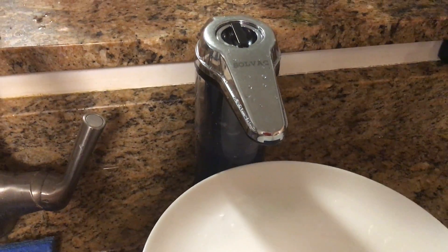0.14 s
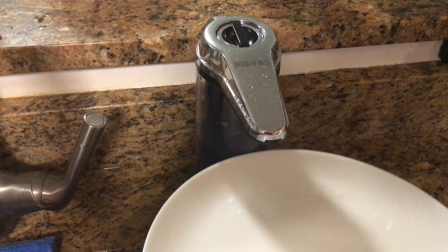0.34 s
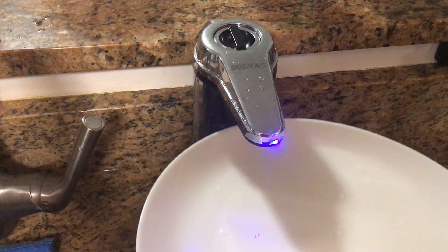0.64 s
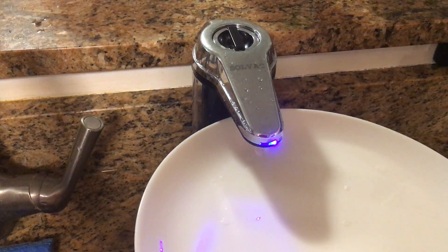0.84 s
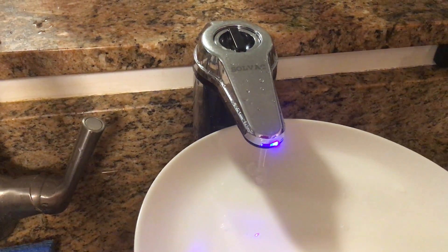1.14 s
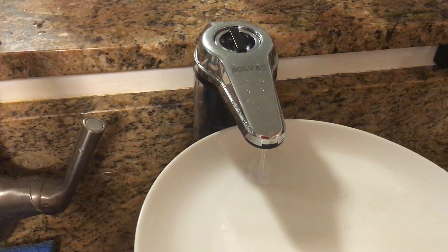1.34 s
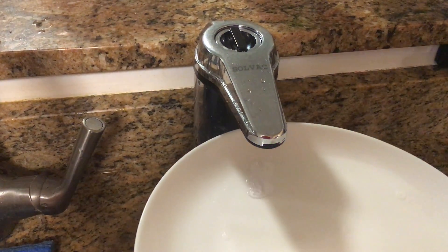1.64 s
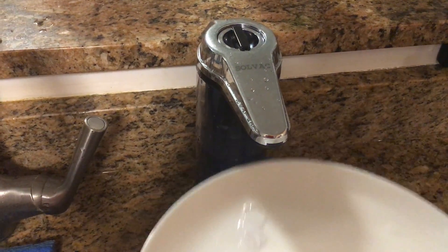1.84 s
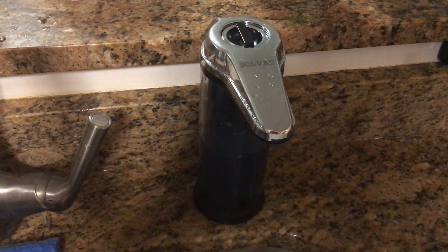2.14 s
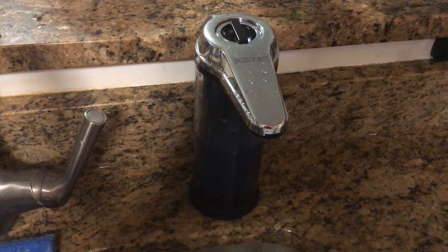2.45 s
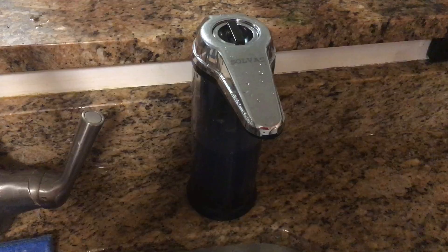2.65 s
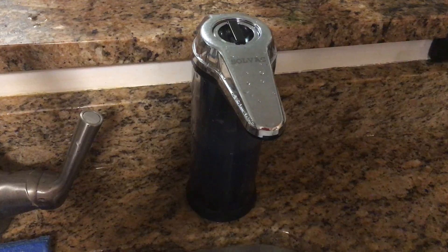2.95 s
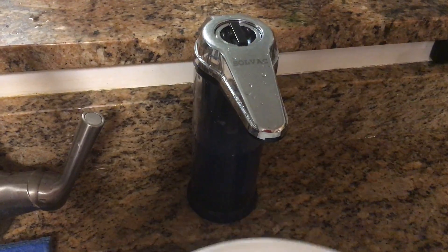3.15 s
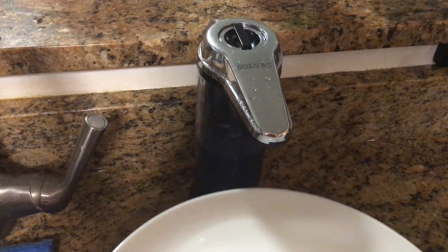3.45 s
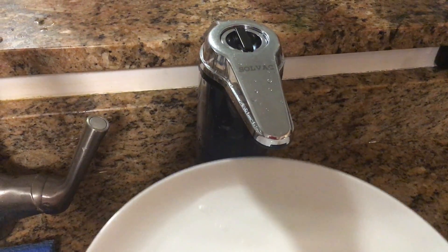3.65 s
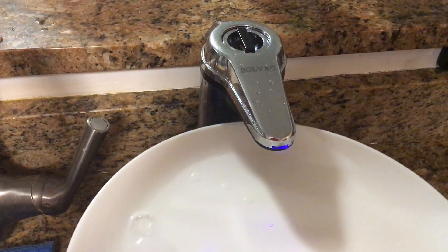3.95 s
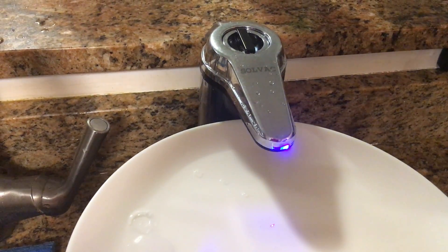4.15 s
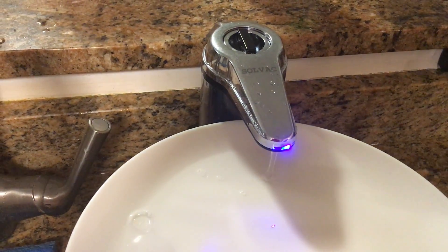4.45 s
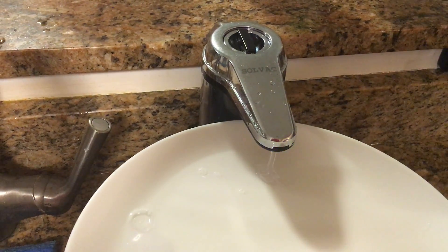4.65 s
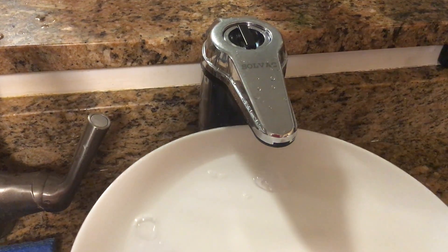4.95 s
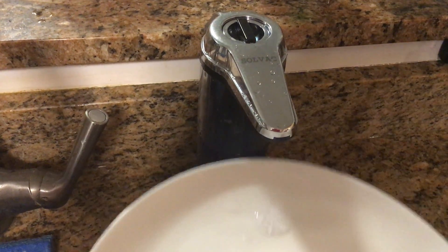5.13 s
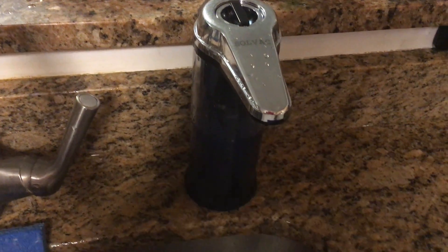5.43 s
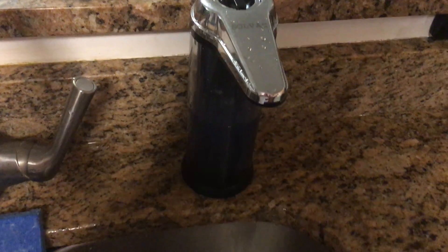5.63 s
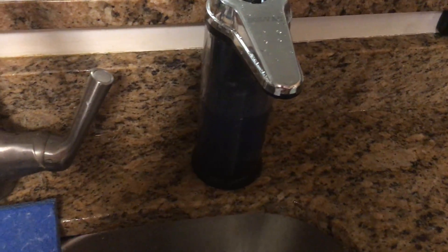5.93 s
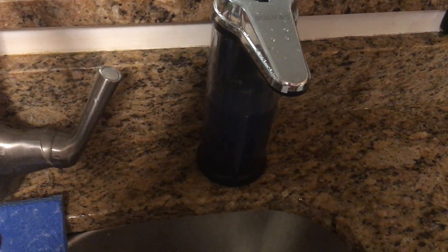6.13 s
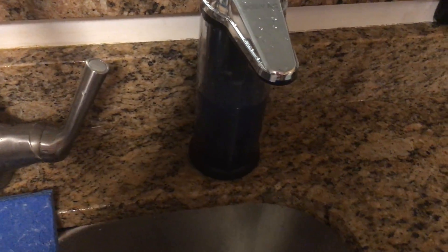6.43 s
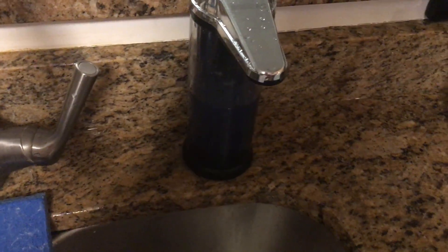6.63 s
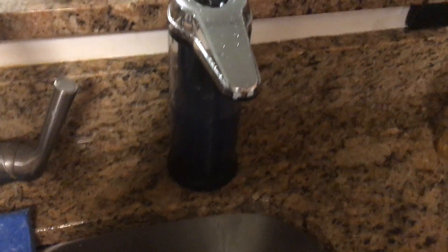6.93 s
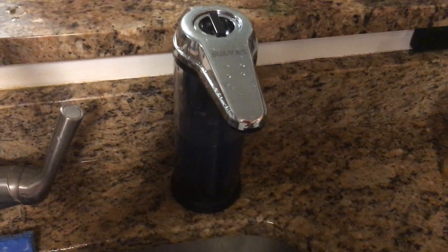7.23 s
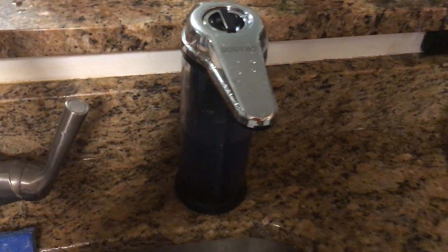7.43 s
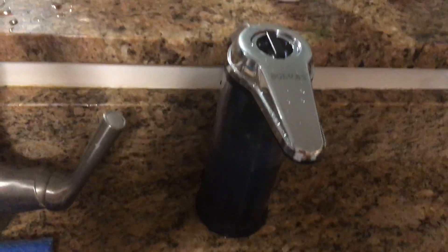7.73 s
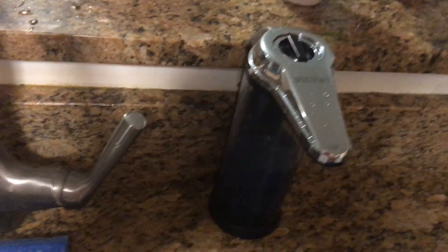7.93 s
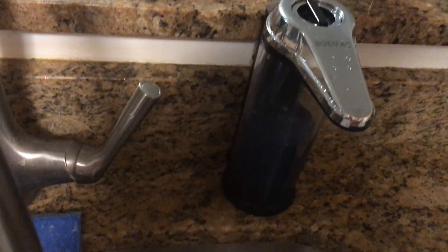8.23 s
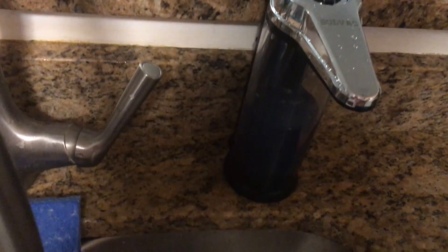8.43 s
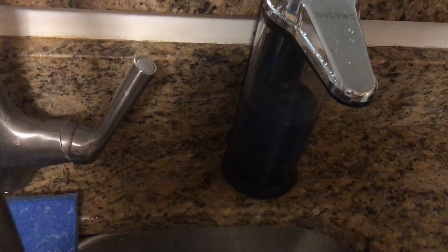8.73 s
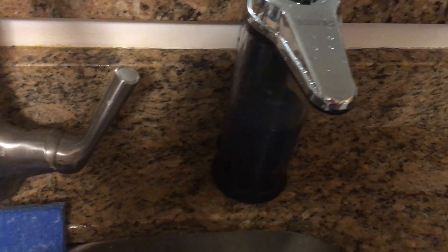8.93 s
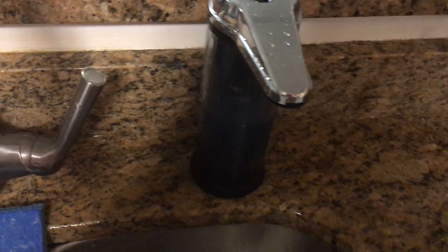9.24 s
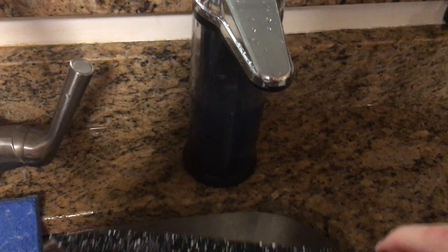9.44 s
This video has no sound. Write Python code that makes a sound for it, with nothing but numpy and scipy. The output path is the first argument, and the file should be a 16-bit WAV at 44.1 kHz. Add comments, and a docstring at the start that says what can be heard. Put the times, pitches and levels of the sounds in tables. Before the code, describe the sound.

Close recording over a low room hum: soft ceramic clinks, a small gritty electric pump buzzing twice in two pairs, long then short, with bubbly soap sounds. Faint rubbing on china between. Around six seconds the plate knocks, then strikes and grates across a steel sink, much louder than the pump, with hollow metal ringing and a short room tail, then quiet and light ticks.

```python
"""Over a small kitchen's low hum, light knocks ring the modes of a china plate.
A touchless soap dispenser serves twice: its geared pump runs forward, coasts, then briefly sucks back.
Soap sings through the nozzle, bubbles tick, and between the servings a finger rubs the plate by stick-slip.
The plate is then set down in a steel sink: it knocks, rebounds and slides, and the steel rings on.
At the end come a few light ticks. The room adds a diffuse tail to every source but its own hum."""
import sys
import numpy as np
from scipy import signal
from scipy.fft import rfft, irfft, next_fast_len
from scipy.io import wavfile
from scipy.ndimage import uniform_filter1d

SR = 44100
rng = np.random.default_rng(int(sys.argv[2]) if len(sys.argv) > 2 else 0)


def to_wav(sig):
    """Store sig (one row per channel, or 1-D mono) as 16-bit WAV at the path in sys.argv[1].

    Samples outside -1..1 are clipped; the rate is SR.
    """
    pcm = np.clip(np.atleast_2d(sig), -1, 1) * 32767
    pcm = np.round(pcm).astype(np.int16)
    wavfile.write(sys.argv[1], SR, pcm.T)  # frames by channels


N = 422460
TIME = np.arange(N) / SR

# free modes of the china plate: (frequency [Hz], relative level [dB], t60 [s])
PLATE_MODES = [(560, -22, .1), (574, -9.5, 0.22), (634, -13.5, .1), (769.4, -4.5, 0.19), (926, -9, .2),
               (1096.2, -8.5, 0.18), (1205, -11.5, 0.28), (1353.8, -4.5, 0.26), (1378.5, -3.5, .26),
               (1636.1, -7, 0.33), (2047, -9.5, 0.17), (2062, -4.5, 0.29), (2110.6, -5.5, 0.28),
               (2279.8, -10.5, 0.27), (2609, -9, 0.13), (3046, -7.5, 0.25), (3529, -11.5, 0.25),
               (3584, -9.5, 0.12), (4252, -15, 0.25), (4518, -12.5, 0.16), (4720, -16.5, 0.18),
               (5170, -22.5, 0.16), (5584, -15, 0.18), (5930, -15.5, 0.15), (5970, -18, 0.18),
               (7051, -21.5, .22), (7340, -22.5, .22), (8400, -37.5, .22), (8640, -29, 0.19),
               (8910, -31.5, .2), (9023, -22, 0.19), (10570, -29.5, 0.18), (11011, -30.5, 0.16),
               (12263, -35, .18), (12896, -35.5, 0.16), (13922, -36, .16)]
# spectrum of the steel sink when shaken: (frequency [Hz], relative level [dB])
SINK_SPECTRUM = [(40, -32), (80, -16), (115, -3), (165, 6.5), (235, -1), (310, 4.5), (420, -7.5),
                 (650, -4.5), (1200, -4.5), (2200, -18), (4000, -45), (16000, -58.5)]


def amp(db):
    """Decibels to amplitude gain."""
    return 10 ** (np.asarray(db) / 20)


def unit(x):
    """Normalization to an rms of one."""
    return x / np.sqrt(np.mean(x ** 2) + 1e-20)


def read(points, hz):
    """Linear interpolation of a table on a log-frequency axis."""
    f, value = np.transpose(points)
    return np.interp(np.log(hz + 1), np.log(f), value)


def follow(rows):
    """Linear interpolation in time: the start of a table and its columns as sample-rate curves."""
    s, *columns = np.transpose(rows)
    t = np.arange(s[0], s[-1], 1 / SR)
    return s[0], [np.interp(t, s, c) for c in columns]


def colour(x, points, tilt_db=0):
    """Spectral shaping: x filtered by a spectrum with a tilt in dB per octave, at unit rms."""
    size = next_fast_len(len(x))
    hz = np.fft.rfftfreq(size, 1 / SR)
    gain = amp(read(points, hz) + tilt_db * np.log2(1 + hz / 1000))
    return unit(irfft(rfft(x, size) * gain, size)[:len(x)])


def resonate(x, hz, width):
    """Resonance: a two-pole filter in a rotating frame, so its centre may glide, at unit rms."""
    turn = np.exp(2j * np.pi * np.cumsum(hz * np.ones(len(x))) / SR)
    r = np.exp(-np.pi * width / SR)
    ringing = signal.lfilter([1], [1, -2 * r, r * r], x / turn)
    return unit((turn * ringing).real)


def add(mix, s, sound):
    """Superposition: a sound enters the mix at s seconds."""
    part = mix[round(s * SR):][:len(sound)]
    part += sound[:len(part)]


def background(whirr_hz=1520, whirr_db=-76, floor_db=-53.5):
    """Broadband noise: a low room hum with the narrow, faint whirr of an appliance."""
    # spectrum of the room hum: (frequency [Hz], relative level [dB])
    floor_spectrum = [(15, -49.5), (25, -29), (44, -6.5), (64, 1.5), (86, -9), (122, 1), (198, -13),
                      (313, -11.5), (421, -16), (482, -30), (537, -20.5), (1020, -30), (1530, -28.5),
                      (1800, -34), (15500, -52)]
    hum, whirr = rng.standard_normal((2, N))
    return amp(floor_db) * colour(hum, floor_spectrum) + amp(whirr_db) * resonate(whirr, whirr_hz, 440)


def pressed_plate(width_hz=100):
    """Contact damping: the modes of the touched plate broaden and join a dense clatter spectrum."""
    # spectrum of the dense clatter: (frequency [Hz], relative level [dB])
    clatter_spectrum = [(150, -25), (600, -16.5), (1300, -5), (2100, -3), (2800, -15), (4400, -17.5),
                        (5100, -29.5), (5800, -21), (6600, -31), (7300, -26.5), (7900, -36), (9000, -29.5),
                        (9800, -38), (15500, -42)]
    hz = np.geomspace(100, 16000, num=500)
    centre, db, _ = np.transpose(PLATE_MODES)[:, :, None]
    modes = (amp(db) ** 2 / (1 + ((hz - centre) / width_hz) ** 2) ** 2).sum(0)
    power = modes + amp(read(clatter_spectrum, hz)) ** 2
    return np.transpose([hz, 10 * np.log10(power)])


def ring(tilt_db, length, focus_hz, lift_db, split=0.0037):
    """Modal synthesis: a blow excites close pairs of modes, weighted by the point of contact."""
    t = TIME[:SR // 2]
    hz, db, t60 = np.transpose(PLATE_MODES)[:, :, None]
    octaves = np.log2(hz / focus_hz)
    gain = amp(db + tilt_db * octaves + lift_db * np.exp(-(octaves / 0.19) ** 2))
    phase = rng.random(hz.shape)  # in cycles
    side = rng.uniform(-0.92, 1, hz.shape)
    first = np.sin(2 * np.pi * (hz * t + phase))
    second = .5 * np.cos(2 * np.pi * (hz * (1 + 2 * split * side) * t + phase))
    decay = amp(-60 * t / (t60 * length))
    return np.sqrt(2) * (gain * decay * (first + second)).sum(0) / np.linalg.norm(gain)


def knock(s, ring_db, clatter_db, thud_db, tilt_db, length, focus_hz, lift_db,
          clatter_t60=0.1226, thud_t60=0.2016, contact_hz=7000):
    """Impact: the blow rings the plate, with a dense short clatter and a duller thud from what it meets."""
    t = TIME[:SR // 2]
    clatter_noise, thud_noise = rng.standard_normal((2, len(t)))
    hz, db = pressed_plate().T
    # a soft contact loses the highest treble first
    contact = np.transpose([hz, db + min(tilt_db, 0) * (hz / contact_hz) ** 2])
    clatter = amp(clatter_db - 60 * t / clatter_t60) * colour(clatter_noise, contact, tilt_db)
    thud = amp(thud_db - 60 * t / thud_t60) * colour(thud_noise, SINK_SPECTRUM, tilt_db=-5.5)
    thud *= 1 - np.exp(-t / 0.0015)
    attack = 1 - np.exp(-t / .0003)
    return s, (amp(ring_db) * ring(tilt_db, length, focus_hz, lift_db) + clatter + thud) * attack


def chatter(s, ring_db, clatter_db, thud_db, tilt_db, length, focus_hz, lift_db, rebound_db,
            count=3, uneven=.15):
    """Lossy rebound: the plate lands again twice, unevenly timed, each time weaker and duller."""
    rebound_s, dulling_db_per_octave, rebound_thud_db = .0085, -1.3, -7.5
    out = np.zeros(SR)
    for k in range(count):
        jitter = np.clip(uneven * rng.standard_normal(), -.5, .5)
        delay = rebound_s * (k + min(k, 1) * jitter)  # the first blow is on time
        loss_db = k * rebound_db
        add(out, *knock(delay, ring_db + loss_db, clatter_db + loss_db,
                        thud_db + loss_db + k * rebound_thud_db,
                        tilt_db + k * dulling_db_per_octave, length, focus_hz, lift_db))
    return s, out


def kitchen(x):
    """Diffuse reverberation: convolution with noise whose decay time depends on frequency."""
    # reverberation time of the kitchen: (frequency [Hz], t60 [s])
    decay_times = [(100, .55), (500, 0.43), (2000, 0.58), (5000, 0.46), (14000, 0.57)]
    hz, t, z = signal.stft(rng.standard_normal(SR), SR, nperseg=256)
    decay = amp(-60 * t / read(decay_times, hz)[:, None])
    tail = signal.istft(z * decay, SR, nperseg=256)[1]
    tail *= 1 - np.exp(-TIME[:len(tail)] / 0.0038)
    return signal.fftconvolve(x, unit(tail))[:N] / np.sqrt(len(tail))


def pump(on, off, full_speed, level_db, fizz_db, spin_up=.05, coast=0.17,
         rasp_db=-10, squeak_db=-19, growl_db=3, stop_db=-4):
    """Periodic excitation: uneven teeth strike the housing each turn; gears whine, the seal squeaks."""
    # gear tones: (multiple of the pump turn [1], relative level [dB])
    gears = [(12, -16.5), (20, -14), (21.66, -11.5), (31, -19.5), (33, -21), (39, -13), (40, -14.5),
             (44, -16.5), (45, -15), (53, -15.5), (59, -14.5), (68, -19), (76, -37.5)]
    # broad spectrum of the housing: (frequency [Hz], relative level [dB])
    housing = [(300, -12.5), (550, -8.5), (900, -13.5), (1150, -9), (1450, -4.5), (1900, -1), (2800, -5.5),
               (3600, -7), (4250, -12.5), (4660, -12), (5100, -14.5), (7200, -17), (8500, -25),
               (15500, -32.5)]
    # narrow resonances of the housing: (frequency [Hz], width [Hz], relative level [dB])
    shell = [(1498.3, 76.5, -10.5), (1875, 136, -17.5), (2105, 140, -18), (2403.5, 73, -15),
             (3110, 68, -22), (3376, 210, -19.5), (3655, 50, -19), (4697, 240, -26)]
    # spectrum of the starting growl: (frequency [Hz], relative level [dB])
    growl_spectrum = [(400, -22.5), (750, -9), (1100, -2.5), (1450, 5.5), (1750, -1), (2300, -6),
                      (2700, -30.5), (8000, -35.5)]
    t = TIME[:round((off - on + coast) * SR)]
    since_off = np.maximum(t - (off - on), 0)
    # share of full speed
    pace = (1 - .75 * np.exp(-t / spin_up)) * np.maximum(1 - since_off / coast, 0)
    wobble, rasp, seal, air, load = rng.standard_normal((5, len(t)))
    unsteady = 1 + .001 * unit(uniform_filter1d(wobble, size=900))
    turns = np.cumsum(full_speed * pace * unsteady) / SR
    teeth = rng.standard_normal(size=800)  # the bumps met during one turn
    turning = unit(np.interp(turns % 1, np.linspace(0, 1, len(teeth)), teeth))
    whirr = amp(-2.0) * colour(turning, housing)
    whirr += sum(amp(db) * resonate(turning, hz, width) for hz, width, db in shell)
    whine = sum(amp(db) * np.sqrt(2) * np.sin(2 * np.pi * (k * turns + rng.random())) for k, db in gears)
    whine *= np.exp(-since_off / 0.038)  # unloaded gears stop whining
    stroke = unit(np.exp(-((turns % 1 - .5) / .08) ** 2))  # one seal stroke a turn
    squeak = stroke * (resonate(seal + turning, 6800, 1510) + amp(-4.5) * resonate(turning, 4612, 395))
    running = whirr + amp(rasp_db) * colour(rasp, housing) + whine
    running += amp(squeak_db) * squeak + amp(fizz_db) * resonate(air, 13450, 6000)
    # the gears growl under the starting torque, and knock through their slack when the power is cut
    growl = np.exp(-t / 0.061) * (1 - np.exp(-t / 0.008)) * colour(load, growl_spectrum)
    slack = (since_off > 0) * np.exp(-since_off / 0.0069) * resonate(load, 900, 740)
    return on, amp(level_db) * (pace ** 1.67 * running + amp(growl_db) * growl + amp(stop_db) * slack)


def tick(s, db, hz, t60=0.075):
    """Decaying noise burst: a tiny bright snap through a broad resonance."""
    t = TIME[:SR // 10]
    return s, amp(db - 60 * t / t60) * resonate(rng.standard_normal(len(t)), hz, 5430)


def squelch(rows, overtone_db=-9, waver=0.009, rough_db=-7):
    """Air-pocket resonance: the pocket in the nozzle sings unsteadily as the soap pushes it along."""
    start, (hz, level_db) = follow(rows)
    flow, drift = rng.standard_normal((2, len(hz)))
    turns = np.cumsum(hz * (1 + waver * unit(uniform_filter1d(drift, size=300)))) / SR
    song = np.sin(2 * np.pi * turns) + amp(overtone_db) * np.sin(2 * np.pi * 2 * turns)
    return start, amp(level_db) * unit(unit(song) + amp(rough_db) * resonate(flow, hz, 87))


def gesture(length, attack_s, release_db_per_s):
    """Envelope of one movement: it swells, holds and decays exponentially; also the time held so far."""
    t = TIME[:round(length * SR) + SR // 4]
    held = np.minimum(t, length)
    return held, np.minimum(t / attack_s, 1) ** 2 * amp(-release_db_per_s * (t - held))


def rub(s, length, level_db, rate, sharpness=0.93):
    """Stick-slip: each slip of the finger is a small puff of friction in the damped plate."""
    held, envelope = gesture(length, attack_s=0.0097, release_db_per_s=599.5)
    moving = held < length
    slips = np.exp(-(rate * held % 1) / sharpness) * rng.standard_normal(len(held)) * moving
    response = ring(tilt_db=-4.0, length=1.0, focus_hz=5030, lift_db=19.5)
    plate = signal.fftconvolve(slips, response)[:len(held)]
    friction = unit(unit(plate) + colour(slips, pressed_plate(), tilt_db=9.5))
    # the root scales the rms by the share of time in motion
    return s, amp(level_db) * envelope * friction * np.sqrt(np.mean(moving))


def sink_ring(s, hz, db, t60):
    """Free vibration: one lightly damped mode of the steel."""
    t = TIME[:SR]
    return s, amp(db - 60 * t / t60) * np.sin(2 * np.pi * hz * t)


def judder(hz, width_hz=45, fall_db=-7):
    """Stick-slip groan: noise through resonances at a gliding rate and its weaker overtones."""
    slips = rng.standard_normal(len(hz))
    return sum(amp(fall_db * np.log2(k)) * resonate(slips, k * hz, k * width_hz) for k in range(1, 4))


def slide(s, length, rumble_db, rasp_db, rasp_db_per_s, judder_db, start_hz, end_hz,
          catches_per_s=1000, grain_db=1.5, grit_db=-4, grip_db=3.26):
    """Friction by random impacts: the plate's foot catches on the steel, shaking both sink and plate."""
    held, envelope = gesture(length, attack_s=0.02904, release_db_per_s=199)
    n = len(held)
    sizes = amp(grain_db * np.minimum(rng.exponential(1, n), 4)) * np.sign(rng.standard_normal(n))
    catches = sizes * (rng.random(n) < catches_per_s / SR) + 0.19 * rng.standard_normal(n)
    # the grip comes and goes
    catches *= amp(grip_db * unit(uniform_filter1d(rng.standard_normal(n), size=600)))
    response = ring(tilt_db=-3.5, length=0.8, focus_hz=680, lift_db=-8.5)
    plate = unit(signal.fftconvolve(catches, response)[:n])
    grit = amp(grit_db) * colour(catches, pressed_plate())
    rasp = amp(rasp_db + rasp_db_per_s * held) * (plate + grit)
    rumble = amp(rumble_db) * colour(catches, SINK_SPECTRUM)
    groan = amp(judder_db) * judder(start_hz + (end_hz - start_hz) * held / length)
    return s, envelope * (rumble + rasp + groan)


def scene():
    """Superposition of dispenser, dishes, their reverberation and the room hum."""
    # knocks on the plate: (time [s], ring [dB], clatter [dB], thud [dB], brightness [dB per octave],
    # share of the free ring time [1], frequency favoured by the contact point [Hz], its lift [dB],
    # change per rebound [dB])
    knocks = [(.155, -29, -33, -32, 4.5, 0.815, 590, 30, -7),
              (.216, -35.5, -62.5, -46.5, -9, 0.49, 617, 18.5, -30),
              (.468, -42.5, -50.5, -43.5, 4.5, 0.746, 570, 35.5, -0.5),
              (4.124, -39, -44, -36.5, 4.5, 0.74, 570, 19, -4),
              (6.031, -16.5, -25, -27.5, -0.12, 0.45, 787, 8, -10.5),
              (6.073, -27, -31, -49, -4, 0.66, 1360, 7.5, -22.5),
              (6.295, -52, -58, -45, -1.5, 0.96, 1370, 5.5, -5),
              (6.389, -56.5, -48, -45.5, 4, 0.96, 2120, -4.5, -14),
              (6.456, -66.5, -47.5, -45.5, 4, 0.48, 2120, -6.5, -15),
              (6.488, -38.5, -40.5, -34.5, 1, 0.193, 1370, 0.5, -21.5),
              (6.548, -34.5, -22, -22.5, -1, 0.49, 2100, 4, -20),
              (7.107, -11.5, -18, -15, 1.5, 0.89, 1370, 9.5, -7),
              (7.133, -10, -14.5, -26, 1.5, 0.99, 2190, 10.5, -4.5),
              (7.197, -12.5, -18.5, -20, 3.5, 0.61, 1334, 18.5, -16),
              (7.232, -19.5, -25, -33, -4, 0.66, 2097, 14, -15),
              (7.445, -25, -32, -39, -2, 0.88, 1350, 7, -1),
              (7.734, -16.5, -13.5, -18.5, 0.5, 0.92, 2150, 3.5, -11.5),
              (8.032, -12.5, -12, -18.5, 3, 0.785, 3097, 3, -4.5),
              (8.058, -17.5, -21, -44, -0.5, 0.8, 772, 15, -14)]
    # pump runs; long ones push soap, short ones suck air back:
    # (power on [s], power off [s], full speed [turns per s], level [dB], air fizz re the run [dB])
    runs = [(0.649, 1.257, 44, -50, -24.5), (1.454, 1.661, 45.75, -47, -20.5),
            (4.04, 4.649, 44.97, -49.5, -23.5), (4.85, 5.053, 46.5, -47, -19.5)]
    # light ticks of soap bubbles and grit: (time [s], level [dB], centre frequency [Hz])
    ticks = [(0.712, -40, 4490), (.719, -56.5, 7500), (1.124, -58, 12000), (4.083, -57.5, 7550),
             (4.5, -63.5, 13000), (8.368, -58.5, 7000), (8.39, -50, 7834), (8.432, -57.5, 8000),
             (8.534, -60.5, 6997)]
    # soap squeezing through the nozzle, one table a squelch: (time [s], pitch [Hz], level [dB])
    squelches = [
        [(.735, 1604, -63.5), (.757, 1172, -52.5), (.785, 959.5, -52), (.83, 715.7, -61), (.88, 698.3, -61.5),
         (.94, 783, -65), (.98, 796, -80)],
        [(4.15, 846, -55.5), (4.2, 790, -57), (4.275, 690.4, -58.5), (4.3, 673.5, -51), (4.32, 846, -46),
         (4.345, 792, -54), (4.38, 807, -65.5)],
    ]
    # strokes of a finger slipping on the plate: (time [s], length [s], level [dB], rate [slips per s])
    rubs = [(2.523, 0.1155, -66.5, 124), (2.646, 0.1016, -61, 85), (2.83, .095, -63.5, 47)]
    # long rings of the steel sink: (time [s], frequency [Hz], level [dB], t60 [s])
    sink_rings = [(6.548, 988.4, -43.5, 0.946), (7.11, 1007, -37, 0.997), (7.734, 602, -33.5, 0.715),
                  (8.032, 598.7, -31.5, .9)]
    # pushes of the plate over the sink: (time [s], length [s], sink rumble [dB], plate rasp [dB],
    # change of the rasp [dB per s], judder [dB], rate at the start [slips per s], at the end [slips per s])
    pushes = [(6.87, 0.069, -64, -77, -7, -54, 252, 292), (7.022, 0.099, -54, -71, 7, -48.5, 294.2, 370),
              (7.11, 0.6764, -34, -24, -34.5, -34, 325, 280),
              (7.955, 0.3771, -37, -40.5, 14.5, -38, 393.4, 276.9),
              (8.421, 0.1577, -59.5, -56.5, -46.5, -56.5, 196, 186)]
    dispenser, dishes = np.zeros((2, N))
    for row in knocks:
        add(dishes, *chatter(*row))
    for row in runs:
        add(dispenser, *pump(*row))
    for row in ticks:
        add(dispenser, *tick(*row))
    for rows in squelches:
        add(dispenser, *squelch(rows))
    for row in rubs:
        add(dishes, *rub(*row))
    for row in sink_rings:
        add(dishes, *sink_ring(*row))
    for row in pushes:
        add(dishes, *slide(*row))
    reverberation = kitchen(amp(-9) * dispenser + amp(-15) * dishes)
    return (dispenser + dishes + reverberation + background())[None]


def record(dry, ceiling=0.62, edge_hz=15950):
    """Soft saturation rounds off the loudest peaks; a linear-phase low-pass then limits the band."""
    rounded = dry / (1 + (dry / ceiling) ** 4) ** (1 / 4)
    low_pass = signal.firwin(511, edge_hz, window=("kaiser", 9), fs=SR)
    return signal.oaconvolve(rounded, low_pass[None], "same")


dry = scene()
out = record(dry)
to_wav(out)
```